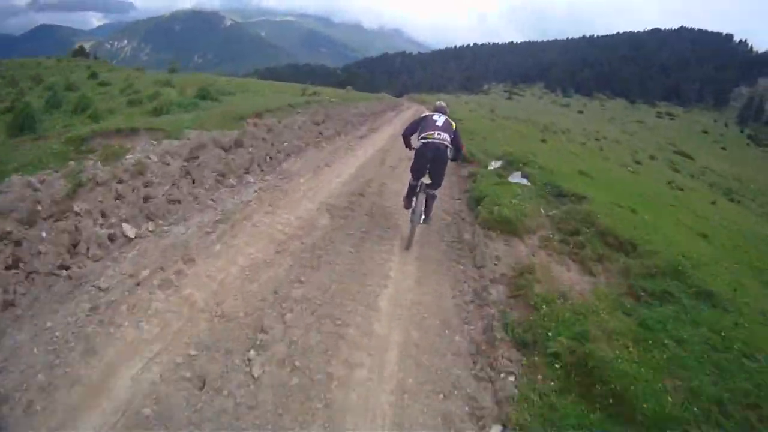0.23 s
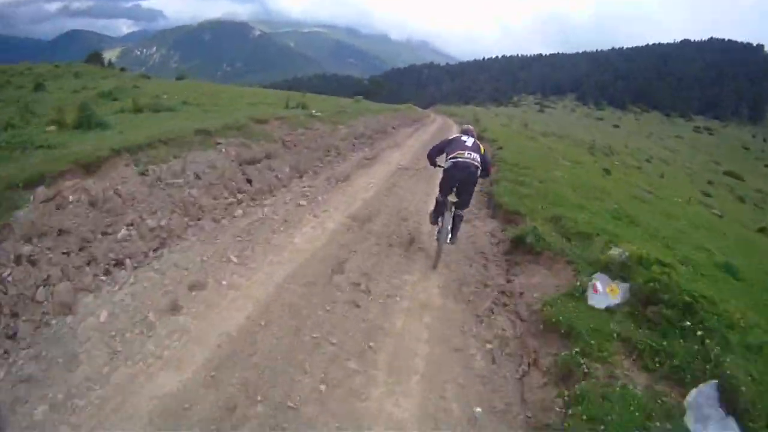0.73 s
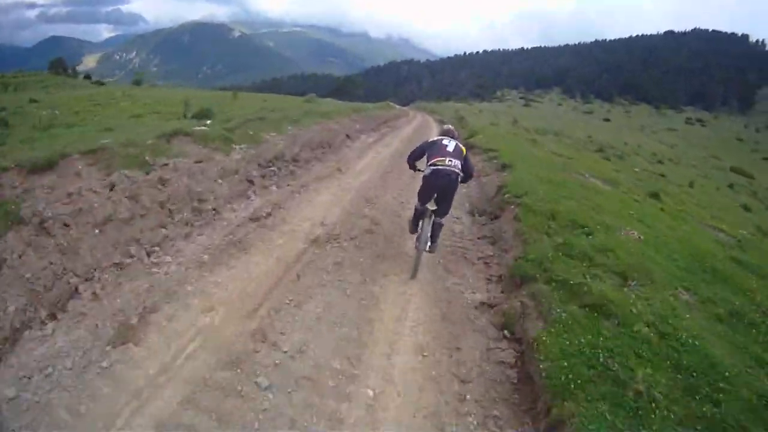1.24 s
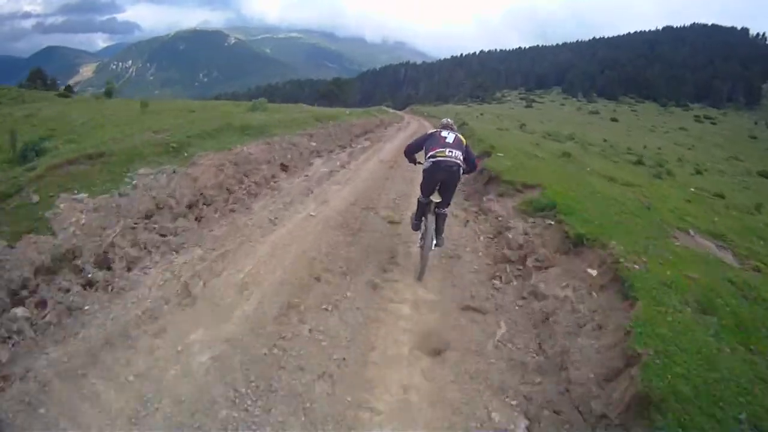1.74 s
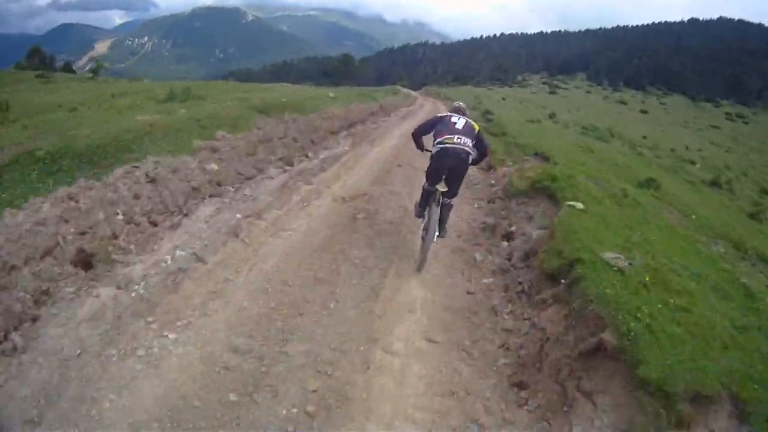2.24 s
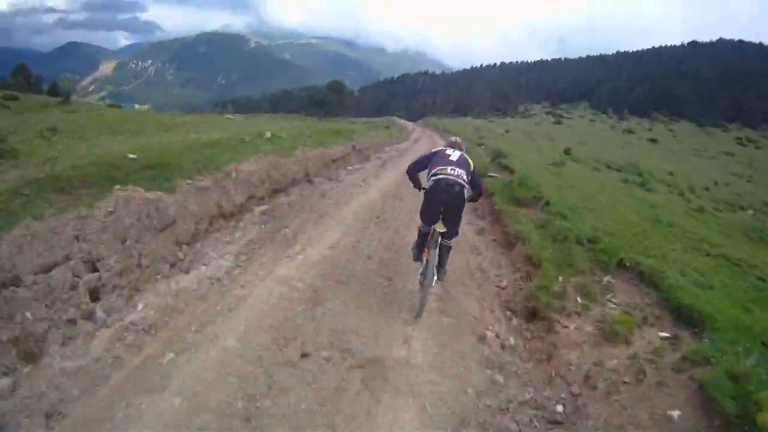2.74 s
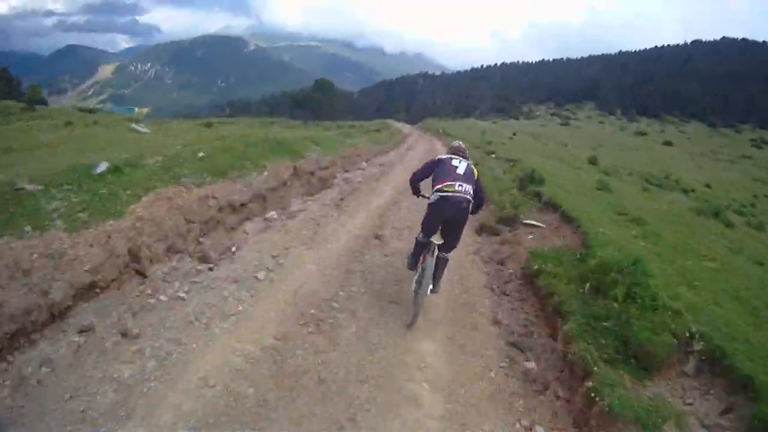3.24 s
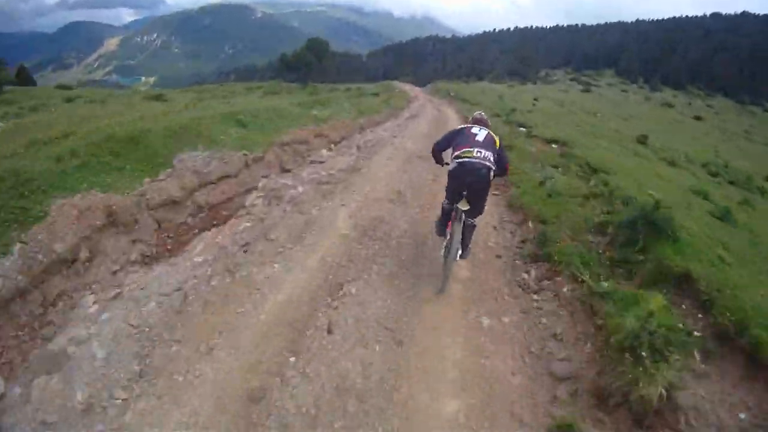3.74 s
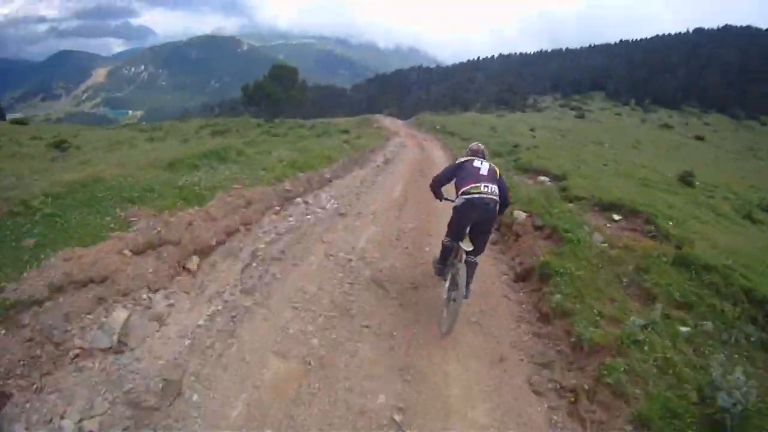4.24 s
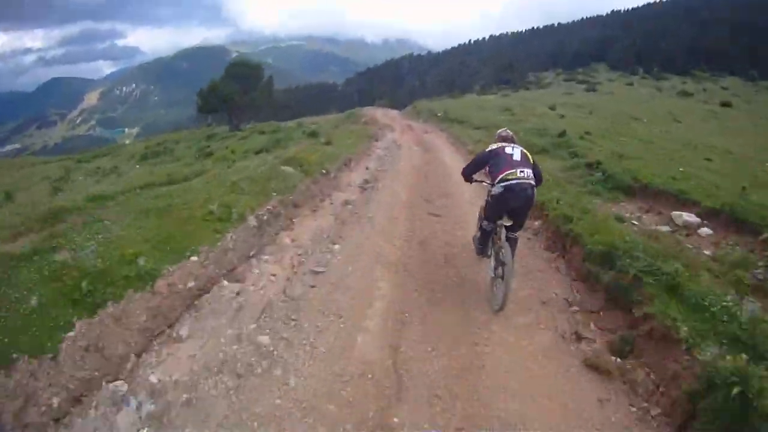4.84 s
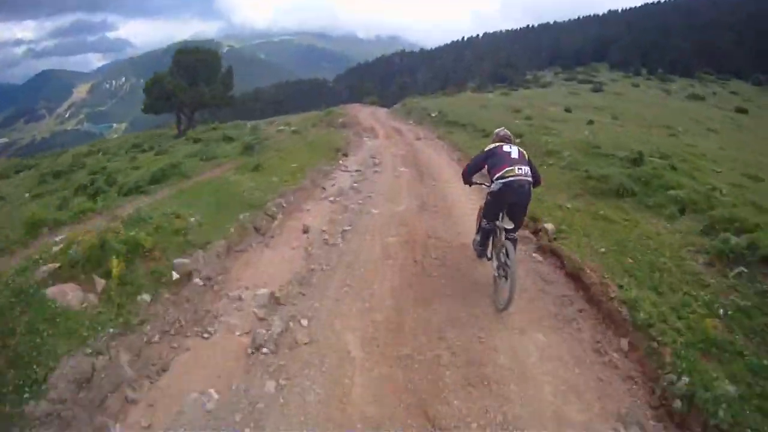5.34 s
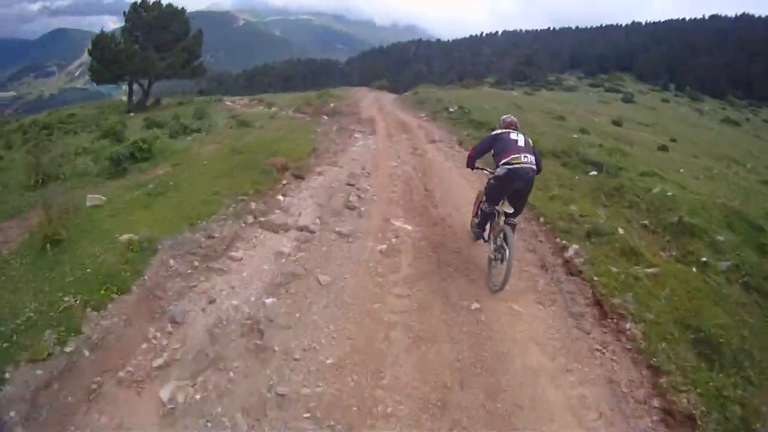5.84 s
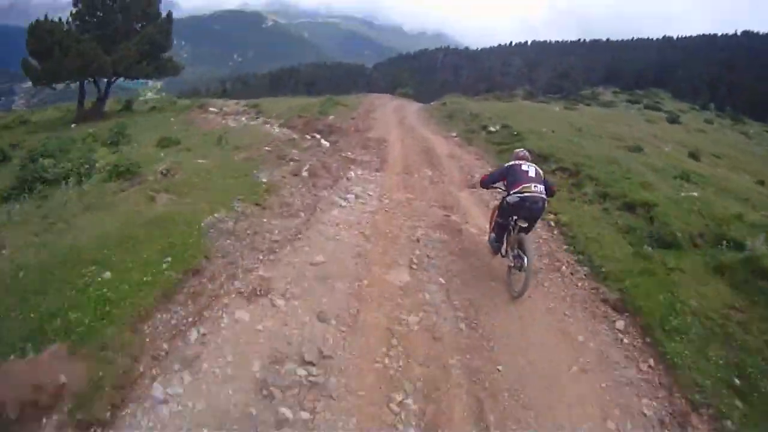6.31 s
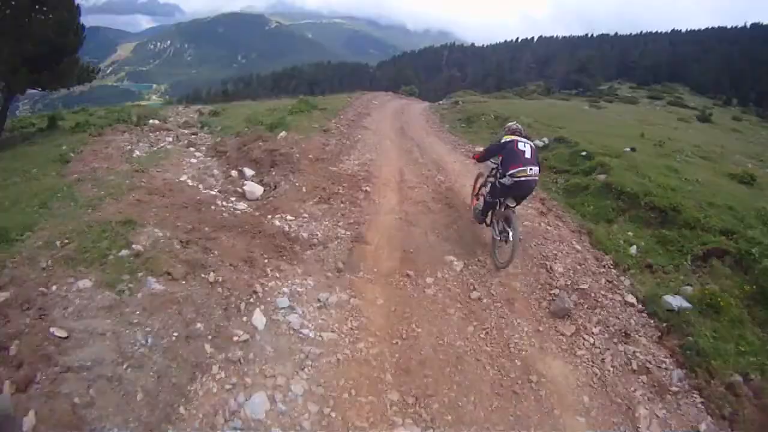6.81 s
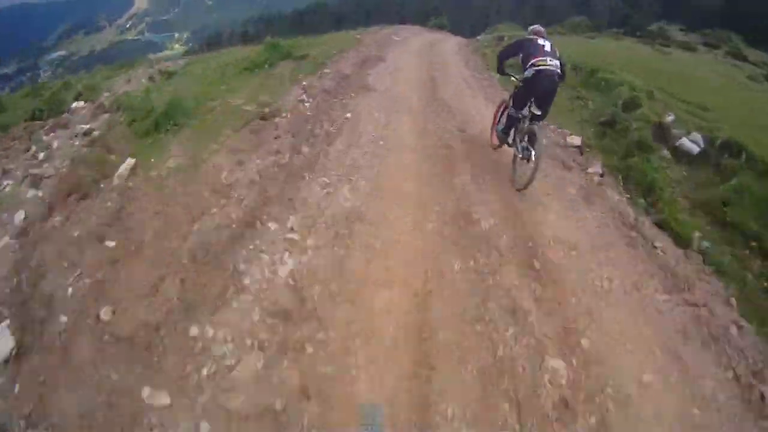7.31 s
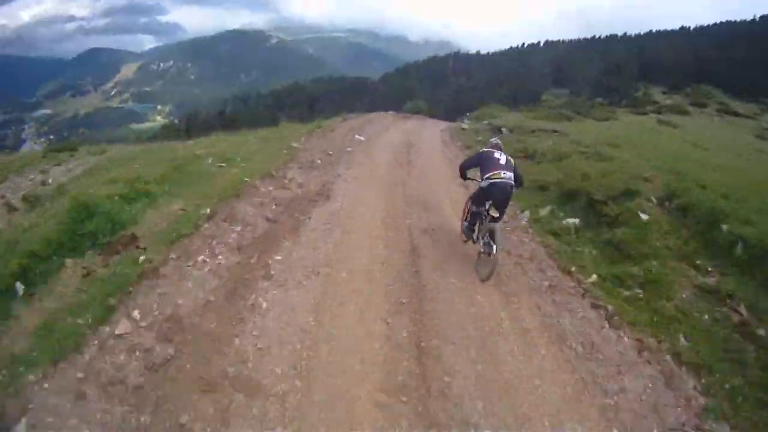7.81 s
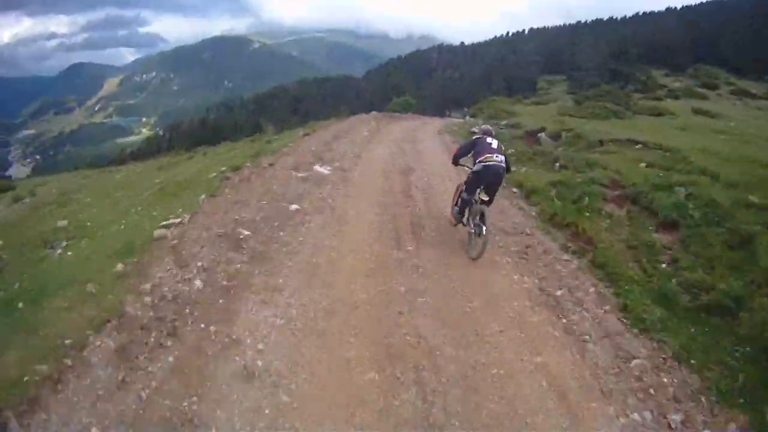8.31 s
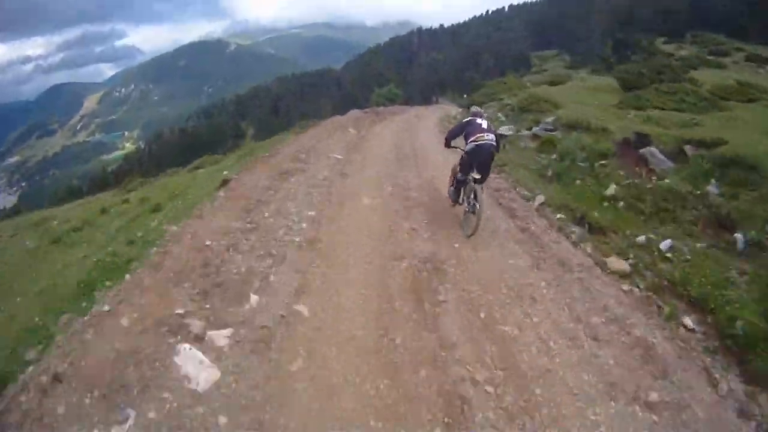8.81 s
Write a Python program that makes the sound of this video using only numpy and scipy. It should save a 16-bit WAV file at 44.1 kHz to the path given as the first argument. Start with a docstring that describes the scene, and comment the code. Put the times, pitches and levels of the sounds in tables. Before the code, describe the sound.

High, fluttering wind squeal on the microphone over a mountain bike crunching down gravel, giving way to rough buffeting and ticking stones.

```python
"""A mountain bike runs fast down loose gravel, heard from a small camera on the rider who follows.
At first, air blowing across a hollow in the camera makes a high, fluttering squeal that surges and
overloads the microphone. After 4 s the flow turns rough: low wind buffeting takes over, and flung
stones tick. Just after 7 s the bike lands with a thump, then the squeal flares with a bright tick of
distortion. All the way down, the tyres crunch, air rushes past and the camera whines faintly."""
import sys
import numpy as np
from scipy import signal
from scipy.io import wavfile

SR = 44100
rng = np.random.default_rng(int(sys.argv[2]) if len(sys.argv) > 2 else 0)


def dump_mix(stems):
    """Bounce the given channels to the path in sys.argv[1] as a 16-bit WAV at rate SR."""
    frames = np.atleast_2d(stems).T  # one column per channel
    limited = np.clip(frames, -1, 1)  # hard clip at full scale
    pcm = np.round(limited * 32767).astype(np.int16)
    wavfile.write(sys.argv[1], SR, pcm)


N = 399546
TIME = np.arange(N) / SR

# rough, swirling air on the camera's case: (time [s], level [dB])
TURBULENT_WIND = [(0, -36.5), (0.55, -43.1), (0.9, -46.5), (1.05, -35.5), (1.55, -27.5), (1.68, -42.5),
                  (2.05, -33), (2.45, -49), (3.05, -39), (3.88, -48.5), (4.2, -25.5), (4.55, -23.5),
                  (5.9, -23.5), (6.35, -32.5), (6.92, -26), (7.37, -34.4), (7.5, -32.5), (8.2, -25.5),
                  (8.75, -23.5), (9.06, -27)]
# eddies, single swirls that slap the case and choke the squeal: (time [s], level [dB], length [s])
EDDY_HITS = [(0.209, -26.5, 0.01), (0.294, -26.5, 0.057), (0.389, -23.5, 0.0054), (1.289, -25, 0.041),
             (1.596, -24, 0.026), (1.837, -18.5, 0.011), (2.059, -30.5, .012), (2.183, -27, 0.017),
             (2.328, -24.5, 0.0067), (2.542, -26, 0.011), (2.77, -21, 0.0048), (2.807, -25.5, 0.0091),
             (3.197, -19.5, 0.0061), (4.001, -31, 0.024), (4.169, -21, 0.0064), (5.64, -24, 0.03),
             (5.838, -25.5, .04), (6.61, -22, 0.027), (6.939, -26, 0.059)]


def squeal(flutter_db=0.9, choke_db=7, gust_hz_per_db=1.5, ceiling=0.83):
    """Air sets a hollow ringing, like blowing over a bottle. Gusts swell the tone and eddies choke it."""
    # how squarely the air meets the hollow sets the loudness: (time [s], level [dB])
    loudness = [(0, -15), (0.6, -13), (2.0, -14), (2.4, -5.5), (2.65, -7.5), (2.95, -12.5), (3.4, -13.0),
                (3.92, -5.5), (4.02, -13.5), (4.44, -14), (4.52, -21.5), (5.8, -21), (6.45, -15.5),
                (6.78, -17), (7.0, -23.5), (7.45, -19), (7.95, -28), (8.4, -27), (8.7, -21), (9.06, -22.5)]
    # faster air raises the pitch: (time [s], pitch [Hz])
    pitch = [(0, 1684.0), (2.15, 1678), (2.4, 1748), (2.8, 1671), (3.6, 1658), (3.92, 1716), (4.05, 1654),
             (4.4, 1718), (4.6, 1676), (7.3, 1644), (7.42, 1561), (7.75, 1643), (8.5, 1658), (9.06, 1619)]
    # gusts of wind: (time [s], rise [dB], length [s])
    gusts = [(0.076, 8, 0.023), (0.208, 9, 0.085), (0.421, 6, 0.048), (0.854, 8, 0.0725), (1.389, 5, 0.063),
             (1.631, 7.5, 0.026), (1.92, 7, 0.029), (2.086, 7, 0.039), (3.069, 4.5, 0.023),
             (3.16, 5, 0.033), (7.267, 11, 0.0596), (7.55, 3, .04), (7.818, 5.5, 0.039)]
    gust_db = sum(rise_db * swell(s, length) for s, rise_db, length in gusts)
    choked = sum(swell(s, 1.02 * length) for s, _, length in EDDY_HITS)
    level_db = curve(loudness) + gust_db - choke_db * choked
    pitch_hz = curve(pitch) + gust_hz_per_db * gust_db
    core = random_swing(80)
    # eddies that barely catch the hollow sound breathier and 70 Hz lower
    breath = random_swing(200) * np.exp(-2j * np.pi * 70 * TIME)
    breath_share = from_db(-17 - 0.33 * level_db)  # larger when the squeal is weak
    gain = from_db(level_db + flutter_db * slow_noise(14))
    swing = gain * (core + breath_share * breath) / np.hypot(1, breath_share)
    swing = swing / (1 + np.abs(swing / ceiling) ** 4) ** (1 / 4)  # levels off at the ceiling
    swing = add_surges(swing, level_db)
    return np.real(swing * np.exp(2j * np.pi * np.cumsum(pitch_hz) / SR))


def add_surges(swing, level_db, stall=0.42, beat_db=3.5, beat_hz=115):
    """For a moment the airflow locks in step with the hollow, and the squeal jumps to a pulsing tone."""
    # the hard surges, most of which overload the microphone: (time [s], peak [dB], length [s])
    hard_surges = [(0.182, 1.2, 0.0055), (0.235, -2, 0.0067), (0.458, 2.5, 0.0053), (0.816, 0, 0.0048),
                   (0.84, 1.8, 0.0094), (0.858, 2.8, 0.012), (0.896, 0.7, 0.0056), (0.934, -2, .006),
                   (1.178, -2, .008), (1.634, -1.5, .012), (1.681, 1, 0.01), (1.853, -2.5, 0.0067),
                   (1.921, 0, 0.0033), (2.106, -0.26, 0.0051), (2.204, -2.5, .007), (2.284, 0.6, 0.0098),
                   (2.3, 2, 0.0027), (2.399, 1.7, 0.0038), (2.413, 0, 0.0045), (2.425, 0.7, 0.0064),
                   (2.456, 2.6, 0.0037), (2.497, 3, .016), (2.584, 1.1, 0.0058), (2.601, 0.9, 0.0051),
                   (2.611, 2.4, 0.0045), (2.652, 3, 0.0077), (2.711, 2, 0.0035), (2.794, 0.66, 0.0042),
                   (3.051, -2, 0.0084), (3.618, 0.9, 0.007), (3.65, 1.2, 0.0044), (3.686, 2.5, 0.0066),
                   (3.736, 3, 0.01), (3.798, 1.5, 0.0063), (3.811, 2.5, 0.0046), (3.843, 3, 0.01),
                   (3.889, 3, 0.037), (3.934, 2.5, 0.021), (3.955, 1.1, 0.0046), (4.301, -2.5, 0.0055),
                   (6.565, -2, 0.0041), (7.268, -.5, .026)]
    phase_wander = 0.18 * slow_noise(110)
    detune_hz = 10 + 22 * slow_noise(110)
    surges = small_surges(level_db) + list(hard_surges)
    # the vibration stalls just before each surge
    for s, _, length in surges:
        near = samples_between(s - 4 * length, s + length)
        swing[near] *= 1 - stall * np.exp(-((TIME[near] - s) / length + 1.4) ** 2)
    # each surge has its own pitch, and a long one pulses several times
    for s, peak_db, length in surges:
        at = int(s * SR)
        near = samples_between(s - 2 * length, s + 2 * length)
        age = TIME[near] - s
        blend = np.exp(-2.6 * np.abs(age / length) ** 3)
        pulses = from_db(peak_db - beat_db * np.sin(np.pi * beat_hz * age) ** 2)
        phase = np.angle(swing[at]) + 2 * np.pi * detune_hz[at] * age + phase_wander[near]
        swing[near] += blend * (pulses * np.exp(1j * phase) - swing[near])
    return swing


def small_surges(level_db, per_s=13, above_db=7, top_db=-3.5, length_s=0.0069):
    """Weaker surges come at random and stand out of the squeal: (time [s], peak [dB], length [s])."""
    wait, size, span = rng.random((300, 3)).T
    times = np.cumsum(.5 + wait) / per_s
    peaks = np.minimum(np.interp(times, TIME, level_db) + above_db + 4 * (size - .5), top_db)
    return [row for row in zip(times, peaks, length_s * (.5 + span)) if row[0] < TIME[-1]]


def buffeting(lump_db=1.46, fitful_db=3, steady_db=-22):
    """Rough air beats on the case, fitful when weak and steadier when strong; eddies add deeper slaps."""
    # tone colour of the rough air: (frequency [Hz], relative level [dB])
    wind_spectrum = [(25, -33), (60, -31.5), (100, -20), (170, -8.5), (280, -3), (470, 1.5), (750, 1),
                     (1100, -8), (1600, -2.5), (2400, -36.5), (3500, -35), (6000, -55)]
    # tone colour of an eddy's slap: (frequency [Hz], relative level [dB])
    slap_spectrum = [(25, -28.5), (70, -16.5), (150, -7.5), (300, -4), (550, 1), (900, -2.5), (1400, -9.5),
                     (2500, -29)]
    level_db = curve(TURBULENT_WIND)
    weakness = np.clip((steady_db - level_db) / 18, .35, 1)
    wobble_db = lump_db * slow_noise(40) + fitful_db * weakness * slow_noise(9)
    wind = from_db(level_db + wobble_db) * coloured(wind_spectrum, white)
    return wind + slap_strength() * coloured(slap_spectrum, white)


def slap_strength():
    """How hard the eddies hit the case at every sample."""
    return sum(from_db(db) * swell(s, length) for s, db, length in EDDY_HITS)


def airstream(rush_db=-34, ring_db=-40, flutter_db=2.03):
    """Air rushes past and keeps the camera's case ringing; both flutter together."""
    # tone colour of smooth airflow: (frequency [Hz], relative level [dB])
    rush_spectrum = [(25, -16.5), (50, -19), (75, -13), (120, -10.5), (300, -25.5), (700, 4.5), (1100, 6.5),
                     (1600, 8.5), (2200, 6), (2600, -1.5), (3100, -16.5), (5000, -39), (9000, -32),
                     (16000, -36)]
    rush = from_db(rush_db) * coloured(rush_spectrum, white)
    ring = from_db(ring_db) * resonance(hz=1235, width_hz=15)
    return (rush + ring) * from_db(flutter_db * slow_noise(36))


def gravel(patch_db=1.1, clump_db=2.5, pebble_db=-1.5, pebble_hz=4470, overload_tick_db=-43):
    """Stones grind under the tyres in patches and clumps, pebbles ping, and grit sprays in bright ticks."""
    # the tyres crunching on the track: (time [s], level [dB])
    tyre_levels = [(0, -46), (1.1, -49), (2.4, -45.5), (2.9, -47.5), (4.1, -46), (4.6, -43), (5.25, -44),
                   (5.55, -46), (6.05, -44), (6.7, -47), (7.2, -42.5), (7.7, -49), (8.55, -45.3),
                   (9.06, -48)]
    # fine grit thrown up on looser ground: (time [s], level [dB])
    spray_levels = [(4.0, -74.5), (4.7, -59), (5.25, -64), (5.6, -72), (6.7, -61), (7.3, -52.5), (7.6, -72),
                    (9.06, -73)]
    # tone colour of the crunch: (frequency [Hz], relative level [dB])
    crunch_spectrum = [(1200, 1), (2300, 0.5), (3000, 0), (3700, 17.5), (4450, -1.5), (5000, -6.5),
                       (5600, -19.5), (7000, -35)]
    # tone colour of the grit: (frequency [Hz], relative level [dB])
    grit_spectrum = [(3500, -2.5), (5200, 6), (6200, 2), (7300, -3.5), (8600, -3.5), (10000, -12.5),
                     (12000, -21.5), (15500, -25.5)]
    crunch_db = curve(tyre_levels)
    patches = patch_db * slow_noise(7)
    clumps = patches + clump_db * slow_noise(58)
    grinding = coloured(crunch_spectrum, lambda: clicks(per_s=7000, spread_db=3))
    crunch = from_db(crunch_db + clumps) * grinding
    ring = signal.iirpeak(pebble_hz, Q=6, fs=SR)
    pings = signal.lfilter(*ring, signal.lfilter(*ring, clicks(per_s=600, spread_db=4)))
    pebbles = from_db(crunch_db + pebble_db + patches) * unit_level(pings)
    spray = from_db(curve(spray_levels) + 0.98 * clumps)
    # the flaring squeal's tick of distortion borrows the grit's bright clicks
    overload_tick = from_db(overload_tick_db) * swell(7.256, length=0.0096)
    ticks = (spray + overload_tick) * coloured(grit_spectrum, lambda: clicks(per_s=1500, spread_db=7.5))
    return crunch + pebbles + ticks


def flung_stones():
    """Stones flung by the tyres ring so briefly that each is a tick."""
    # each stone's hit: (time [s], level [dB], pitch [ratio])
    hits = [(4.046, -32, 1.12), (4.746, -19, 0.7), (5.002, -30, 1.25), (5.039, -30, 1.02),
            (5.262, -21.5, 0.78), (5.557, -24, 0.65), (6.338, -27, 1.06), (6.352, -21.5, 0.98),
            (6.357, -19, 0.6), (6.384, -25, 0.69), (7.609, -29, 0.946), (7.872, -27, 1.15),
            (7.954, -25, 1.11), (8.249, -25.5, 1.204), (8.564, -24, 0.99)]
    # a stone's ringing tones: (frequency [Hz], level [dB], time to fade by 60 dB [s])
    tones = [(2660, -4.5, 0.0078), (3200, 3.5, .006), (4380, 0.5, 0.0056), (5600, -22, 0.0031),
             (6800, -21, 0.0031)]
    return struck(hits, tones)


def scrapes_and_tick():
    """Bike and stones squeak and scrape; at 7.256 s, a bright tick as the squeal strains the microphone."""
    # short swells of noise: (time [s], level [dB], length [s], pitch [Hz], band width [Hz])
    bursts = [(0.806, -34, 0.011, 2540, 250), (0.816, -52, 0.024, 8500, 2600),
              (4.378, -59, .008, 9100, 1100), (4.821, -52, 0.01, 8940, 1300),
              (5.96, -33.5, 0.041, 2390, 600), (6.346, -34.5, 0.011, 4300, 1206),
              (7.409, -39.5, 0.017, 4690, 600), (7.965, -39, 0.031, 4360, 593),
              (7.256, -50, .008, 12500, 5000), (8.52, -62, 0.011, 9430, 1202),
              (8.581, -40, 0.015, 4600, 600), (8.98, -60, .018, 9000, 1400)]
    out = np.zeros(N)
    for s, db, length, hz, width in bursts:
        near = samples_between(s - 4 * length, s + 4 * length)
        age = TIME[near] - s
        noise = unit_level(band_pass(rng.standard_normal(SR), hz - width / 2, hz + width / 2))
        out[near] += from_db(db) * np.exp(-(age / length) ** 2) * noise[:len(age)]
    return out


def bike(drone_db=-61, shake_db=2, wind_follow=0.19, slap_db=-27):
    """Rolling drones through the camera mount, more when the wind shakes it, and a landing thumps it."""
    # the bike lands after a bump: (time [s], level [dB], pitch [ratio])
    jolts = [(7.119, -20, 1), (7.139, -27, 1), (7.178, -40, 0.87)]
    # the mount's ringing tones: (frequency [Hz], level [dB], time to fade by 60 dB [s])
    mount_tones = [(72, -7, 0.11), (125, -1, 0.039), (171, 2, 0.1)]
    wind_db = curve(TURBULENT_WIND)
    shaking = from_db(drone_db + wind_follow * (wind_db - wind_db.mean()) + shake_db * slow_noise(4))
    drone = (shaking + from_db(slap_db) * slap_strength()) * resonance(hz=73, width_hz=31)
    return drone + struck(jolts, mount_tones)


def electronics(whine_hz=7867.5, frames_per_s=59.5, whine_db=-62.5, hiss_db=-67):
    """The camera whines, its wave flipping over with each picture it takes, and the microphone hisses."""
    flips = np.tanh(4 * np.sin(np.pi * frames_per_s * TIME))
    whine = np.sqrt(2) * from_db(whine_db) * flips * np.sin(2 * np.pi * whine_hz * TIME)
    return whine + from_db(hiss_db) * white()


def struck(hits, tones, scatter_db=1.0):
    """Each hit sets all of an object's tones ringing and fading, each with a slightly random strength."""
    out, age = np.zeros(N), TIME[:SR // 4]
    for s, db, ratio in hits:
        at = int(s * SR)
        for k, (hz, tone_db, fade_s) in enumerate(tones):
            fade = from_db(db + tone_db + scatter_db * rng.standard_normal() - 60 * age / fade_s)
            ring = fade * (-1) ** k * np.sin(2 * np.pi * hz * ratio * age)
            out[at:at + len(age)] += ring[:N - at]
    return out


def resonance(hz, width_hz):
    """A tone kept ringing by random pushes."""
    return np.real(random_swing(width_hz / 2) * np.exp(2j * np.pi * hz * TIME))


def random_swing(width_hz):
    """A vibration's drifting size and phase (its place in the cycle), held as complex numbers."""
    return slow_noise(width_hz) + 1j * slow_noise(width_hz)


def slow_noise(width_hz, step=8):
    """A random wobble of about 1 either way, with nothing much faster than width_hz."""
    low_pass = signal.butter(2, width_hz, fs=SR / step, output="sos")
    slow = signal.sosfilt(low_pass, rng.standard_normal((N + SR) // step + 2))[SR // step:]
    return np.interp(np.arange(N) / step, np.arange(len(slow)), unit_level(slow))


def coloured(spectrum, source):
    """Give noise a tone colour, in bands a third of an octave wide fed in turn by two separate noises."""
    hz, db = np.transpose(spectrum)
    edges = np.geomspace(hz[0], hz[-1], round(3 * np.log2(hz[-1] / hz[0])) + 1)
    noises, out = (source(), source()), 0
    for k, (low, high) in enumerate(zip(edges, edges[1:])):
        band_db = np.interp(np.log(low * high) / 2, np.log(hz), db)
        out = out + from_db(band_db) * band_pass(noises[k % 2], low, high)
    return unit_level(out)


def clicks(per_s, spread_db):
    """Random clicks of uneven size and sign."""
    sizes = from_db(spread_db * np.minimum(rng.exponential(1, N), 4)) * rng.choice([-1, 1], N)
    return sizes * (rng.random(N) < per_s / SR)


def white():
    """White noise: an even hiss."""
    return rng.standard_normal(N)


def band_pass(x, low_hz, high_hz, order=2):
    """Keep the sound between two frequencies."""
    return signal.sosfilt(signal.butter(order, [low_hz, high_hz], "band", fs=SR, output="sos"), x)


def swell(s, length):
    """A smooth rise and fall around second s."""
    return np.exp(-np.minimum(((TIME - s) / length) ** 2, 20))


def curve(points):
    """Join (time, value) points with straight lines."""
    return np.interp(TIME, *np.transpose(points))


def samples_between(start_s, end_s):
    """The samples in a stretch of time."""
    return slice(max(int(start_s * SR), 0), int(end_s * SR))


def from_db(db):
    """Turn decibels into a multiplier."""
    return np.exp(np.asarray(db) * (np.log(10) / 20))


def unit_level(x):
    """Scale to an average power of 1."""
    return x / np.sqrt(np.mean(np.abs(x) ** 2) + 1e-20)


def scene():
    """Wind on the camera over the tyres and the bike, in open air."""
    stones = flung_stones()
    wind = squeal() + buffeting() + airstream()
    return (wind + gravel() + stones + scrapes_and_tick() + bike() + electronics())[None]


def record(dry, crackle_above=0.75, crackle_db=-12, bite_db=-1, bite_hz=12200, cutoff_hz=15700):
    """The microphone overloads: loud peaks flatten, crackle and gain a bright bite. Top treble is cut."""
    flattened = dry / (1 + np.maximum(np.abs(dry / .99), .5) ** 80) ** (1 / 80)
    strain = np.maximum(np.abs(flattened) - crackle_above, 0) * white()
    crackle = from_db(crackle_db) * band_pass(strain, 1500, 5000, order=1)
    bite = from_db(bite_db) * signal.lfilter(*signal.iirpeak(bite_hz, Q=5, fs=SR), flattened - dry)
    low_pass = signal.ellip(10, .1, 70, cutoff_hz, fs=SR, output="sos")
    return signal.sosfilt(low_pass, flattened + crackle + bite)


dry = scene()
out = record(dry)
dump_mix(out)
```